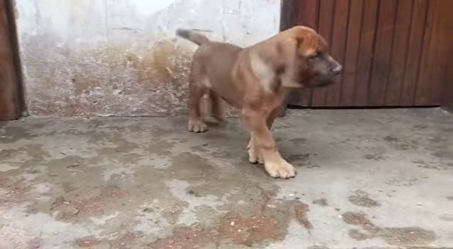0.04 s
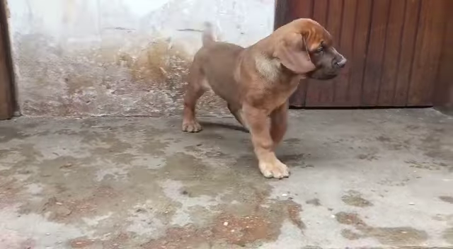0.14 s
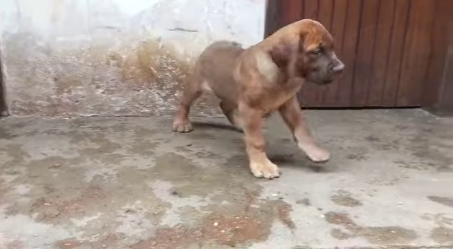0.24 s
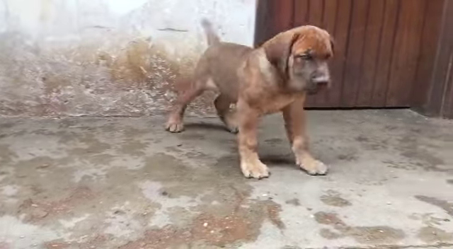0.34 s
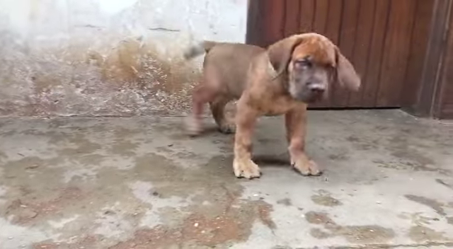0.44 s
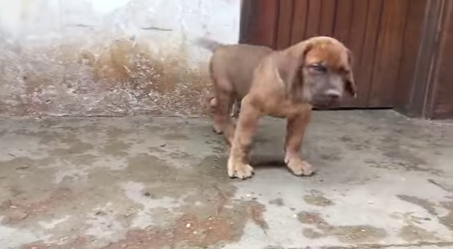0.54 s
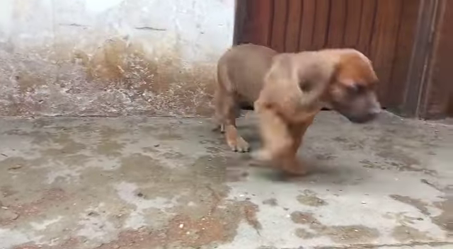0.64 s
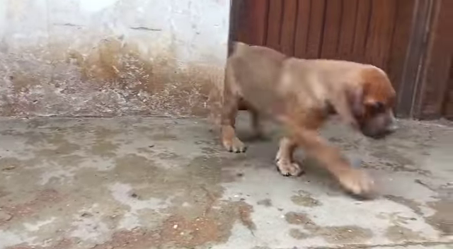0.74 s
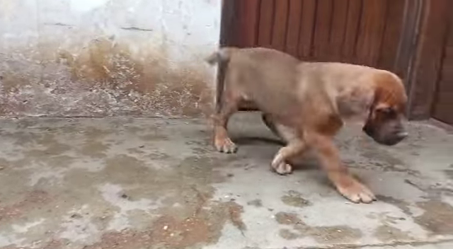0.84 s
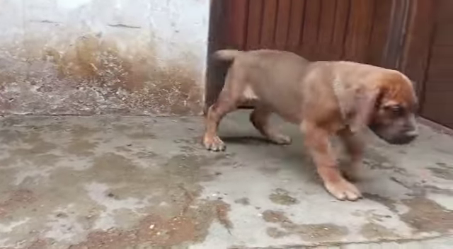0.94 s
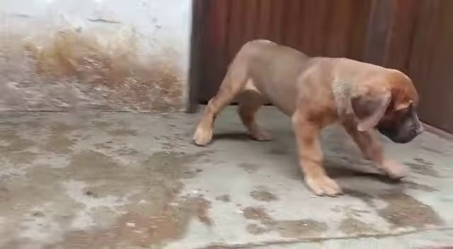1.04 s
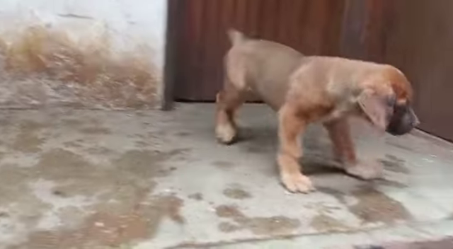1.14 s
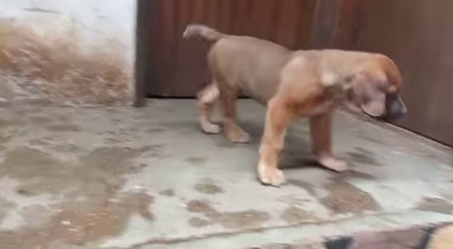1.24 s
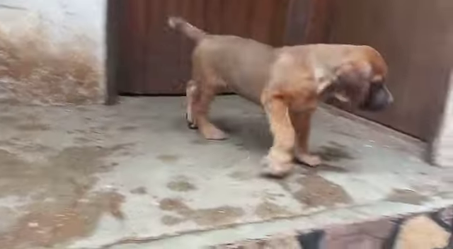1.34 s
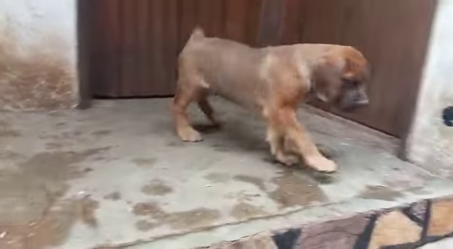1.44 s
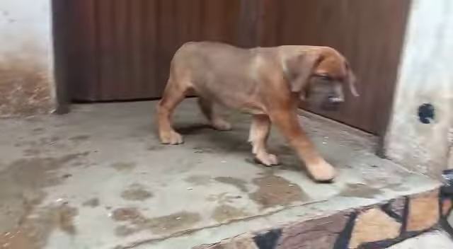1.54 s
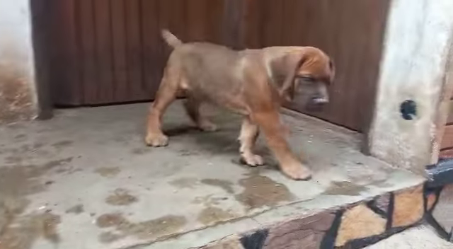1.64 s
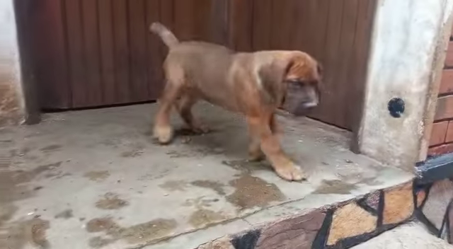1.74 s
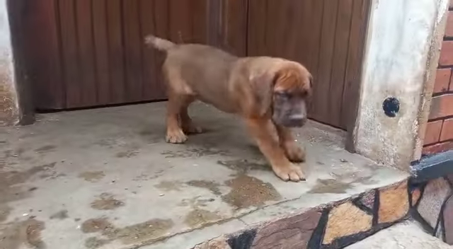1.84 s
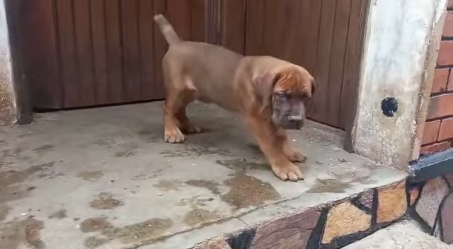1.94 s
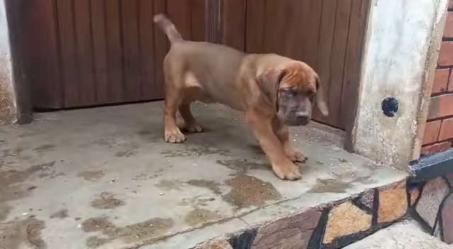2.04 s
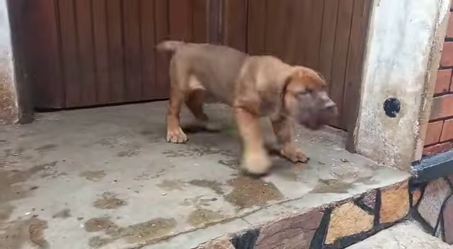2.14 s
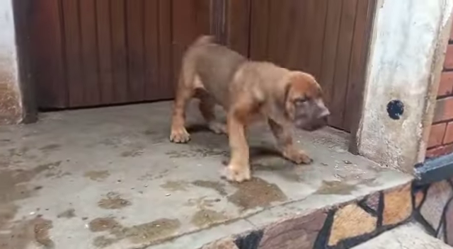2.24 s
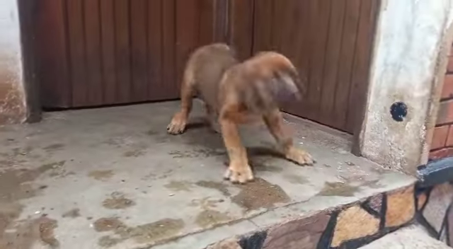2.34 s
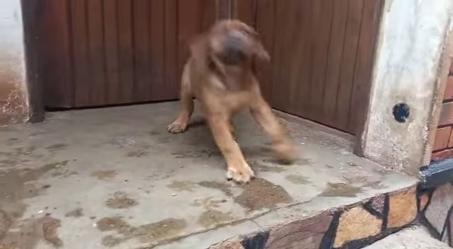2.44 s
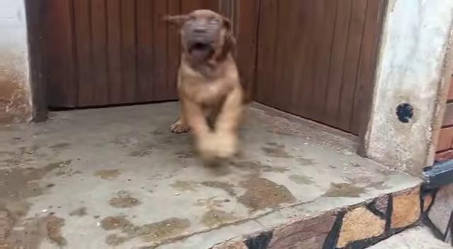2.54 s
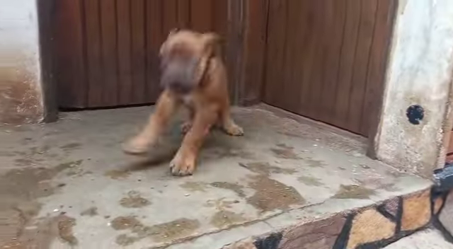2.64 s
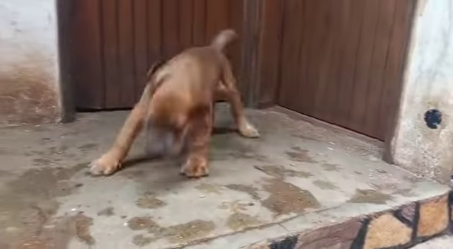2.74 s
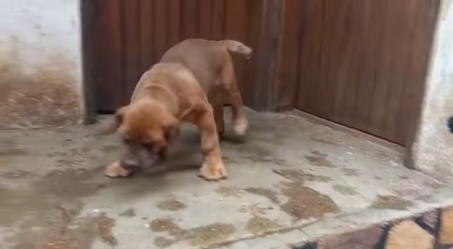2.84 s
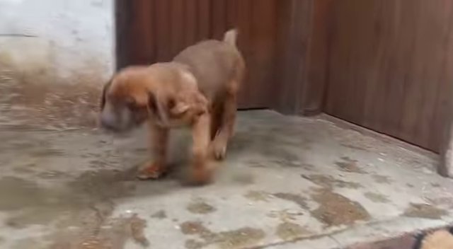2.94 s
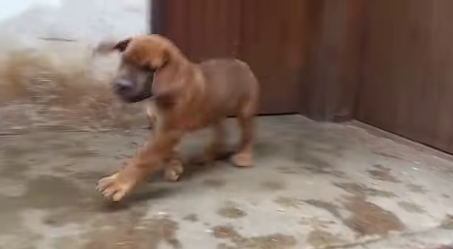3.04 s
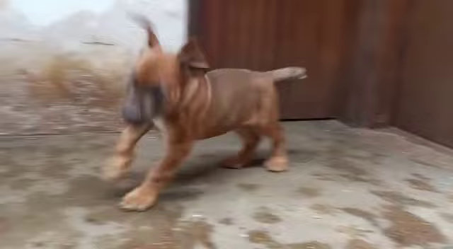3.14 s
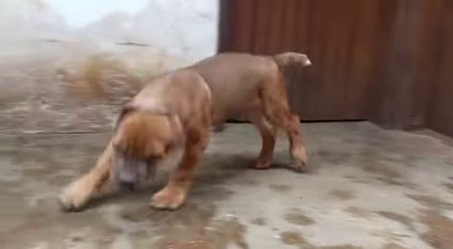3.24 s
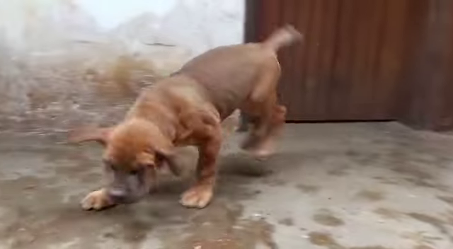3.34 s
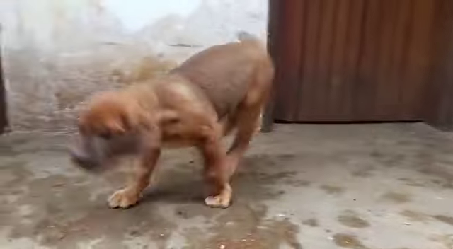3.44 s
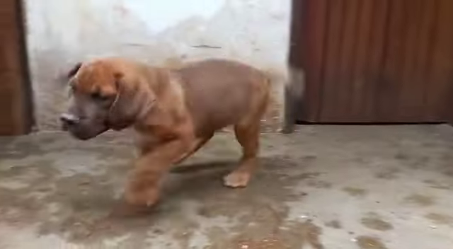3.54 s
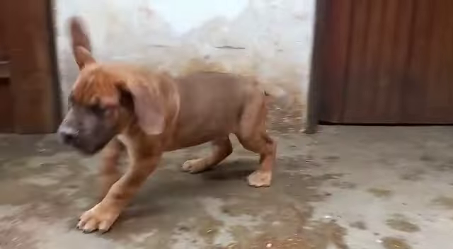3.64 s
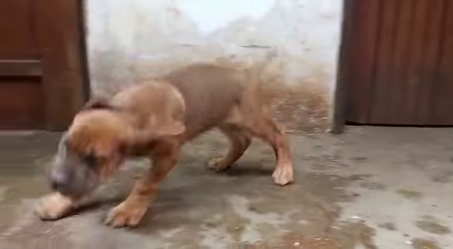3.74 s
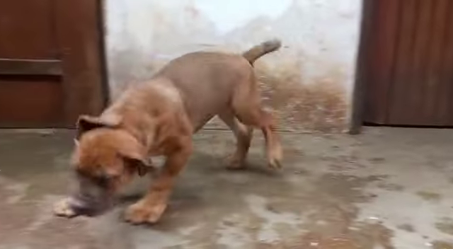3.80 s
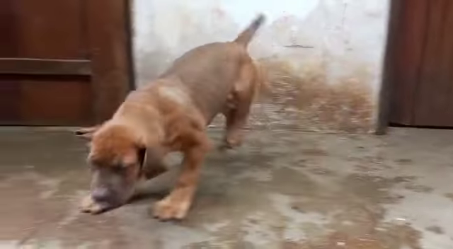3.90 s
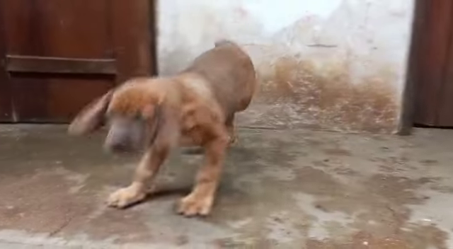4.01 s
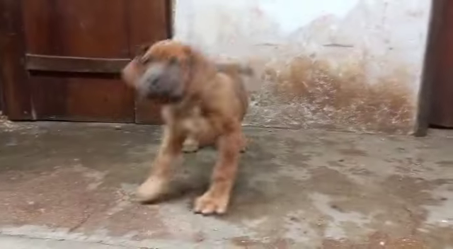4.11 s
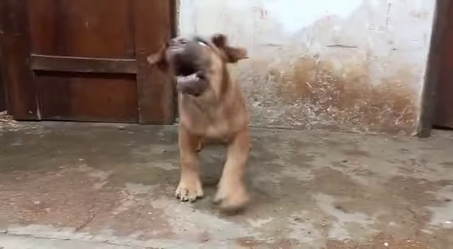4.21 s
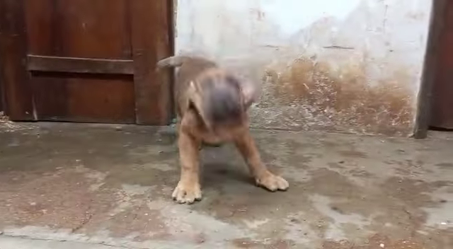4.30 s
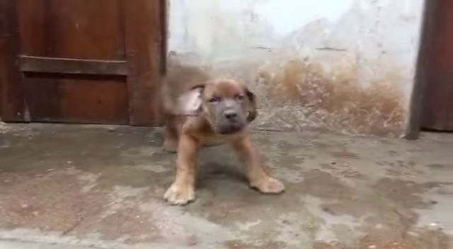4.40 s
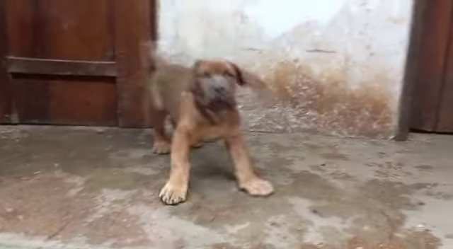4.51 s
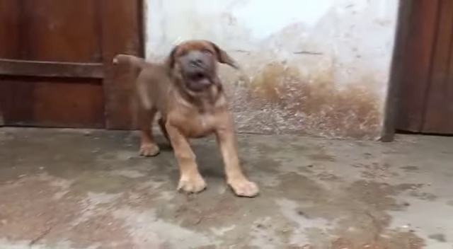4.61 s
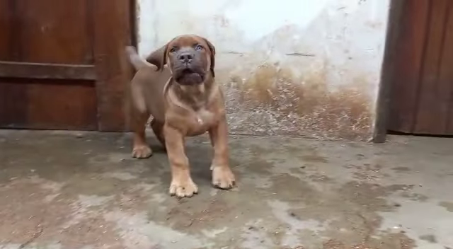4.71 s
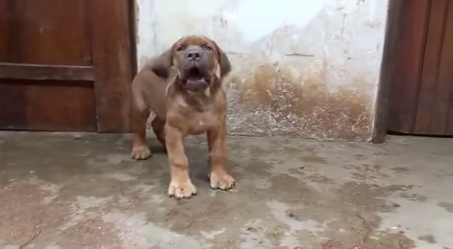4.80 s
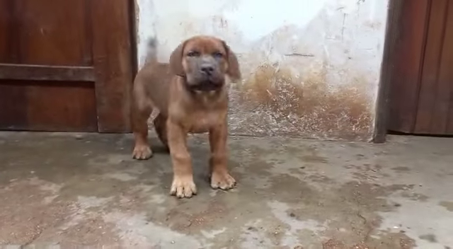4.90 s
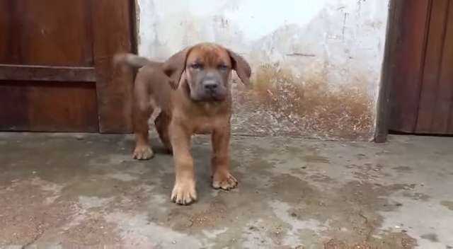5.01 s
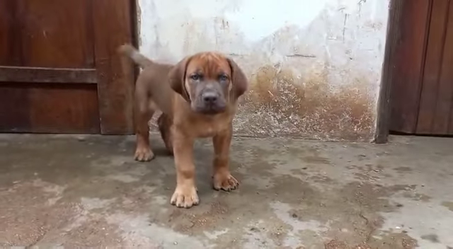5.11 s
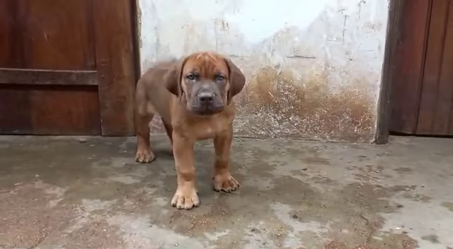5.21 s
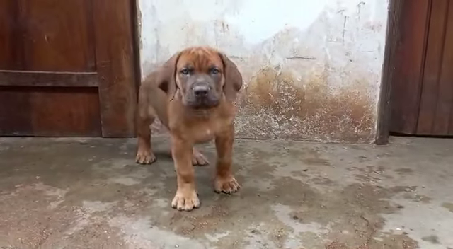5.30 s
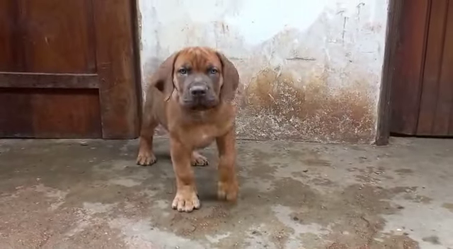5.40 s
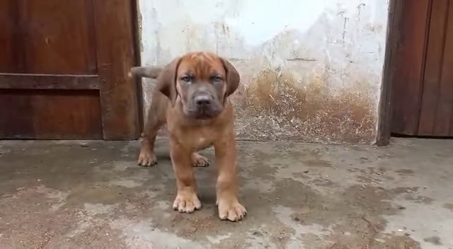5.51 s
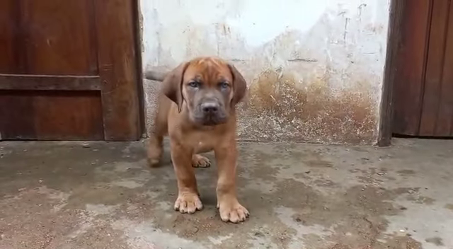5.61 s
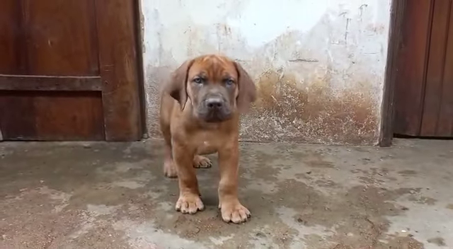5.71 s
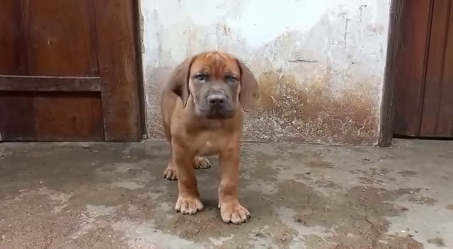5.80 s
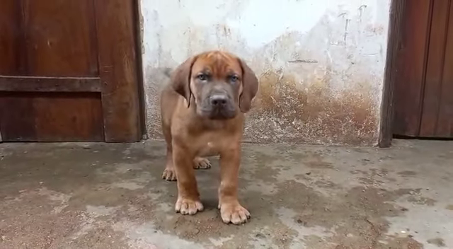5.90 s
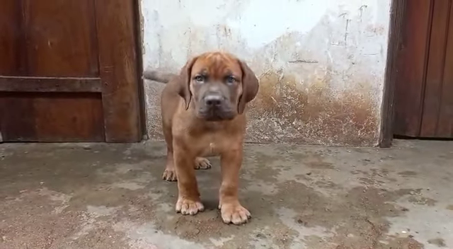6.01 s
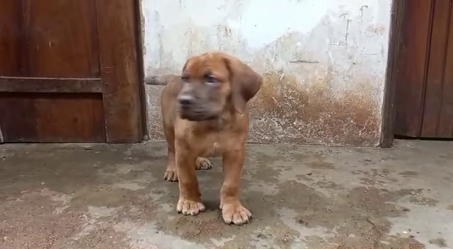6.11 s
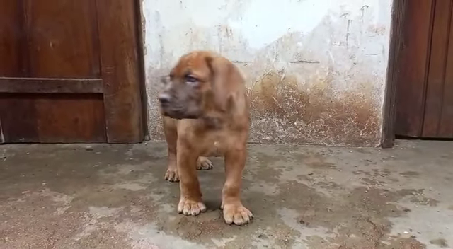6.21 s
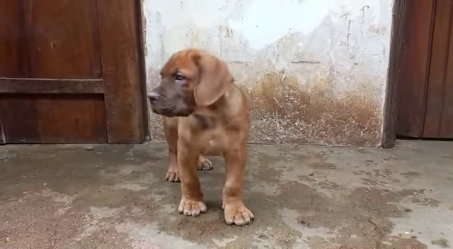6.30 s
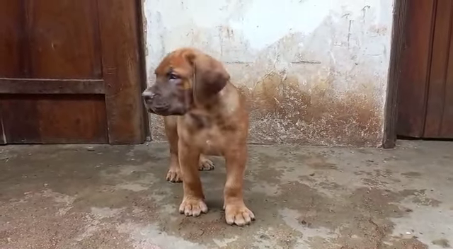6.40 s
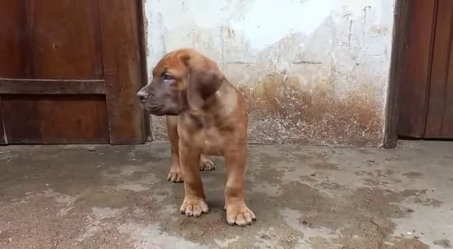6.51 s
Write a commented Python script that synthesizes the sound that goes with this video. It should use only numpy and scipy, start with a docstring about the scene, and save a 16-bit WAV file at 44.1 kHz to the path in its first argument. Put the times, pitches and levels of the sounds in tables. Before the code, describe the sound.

A puppy gives high, whistly whines, then breaks into short, cracking yelps and barks and a long moan in an echoing yard.

```python
"""Puppy in a concrete yard

A puppy whines six times, breaks into yelps and barks, and ends on a long moan. A thin whistle from its
nose starts and ends the whines; each bark starts clean, cracks, mostly turns hoarse and may sink to a moan.
Walls and doors ring after each call. Paws scuff, something hoots far away, the puppy sniffs,
and the hand-held microphone rumbles faintly."""
import sys
import numpy as np
from scipy import signal
from scipy.fft import rfft, irfft, next_fast_len
from scipy.io import wavfile
from scipy.ndimage import uniform_filter1d, minimum_filter1d

SR = 44100
rng = np.random.default_rng(int(sys.argv[2]) if len(sys.argv) > 2 else 0)


def unload_audio(sound):
    """Save the sound as a 16-bit wav file, at the path given as the first command line argument."""
    columns = np.transpose(np.atleast_2d(sound))
    # keep every value between -1 and 1, then stretch to whole-number steps
    steps = np.round(np.clip(columns, -1, 1) * 32767)
    wavfile.write(sys.argv[1], SR, steps.astype(np.int16))


N = 288855
TOP_HZ = 15800  # upper edge of the sound

# tone colour of the voice with the mouth nearly shut: f/Hz, level/dB
SHUT_MOUTH = [(1200, 0.5), (1700, -8), (2400, -3.5), (3000, 1.5), (3600, -3), (4400, -7.5), (5400, -19),
              (6500, -31), (9000, -36), (16000, -32)]
# tone colour of a deep rumble: f/Hz, level/dB
RUMBLE_COLOUR = [(20, -45.5), (45, -16), (75, 1), (130, 3.5), (200, -5.5), (400, -19), (1200, -42)]


def gain_of(db):
    """Turns decibels into a factor to multiply a sound by."""
    return 10 ** (np.asarray(db) / 20)


def evened(x):
    """Scales a signal to an average strength (rms) of 1."""
    return x / np.sqrt(np.mean(x ** 2) + 1e-20)


def read(points, hz):
    """Looks up a table by frequency, on a scale of octaves."""
    f, value = np.transpose(points)
    return np.interp(np.log(hz + 1), np.log(f + 1), value)


def add(mix, start, sound):
    """Adds a sound into the mix at a start time in seconds."""
    part = mix[max(round(start * SR), 0):][:len(sound)]
    part += sound[:len(part)]


def coloured(x, colour):
    """Makes each frequency louder or softer, as a tone colour table says."""
    return irfft(rfft(x) * gain_of(read(colour, np.fft.rfftfreq(len(x), 1 / SR))), len(x))


def noise(colour, size=N):
    """Noise of strength 1 with the given tone colour."""
    return evened(coloured(rng.standard_normal(size), colour))


def wander(size, rate_hz):
    """A smooth random wobble of strength 1, mostly slower than the rate."""
    hz = np.fft.rfftfreq(SR, 1 / SR)
    return evened(irfft(rfft(rng.standard_normal(SR)) / (1 + (hz / rate_hz) ** 4), SR))[:size]


def span(length, fade):
    """Gives the time since a sound began, and a gate that fades it in and out."""
    t = np.arange(0, length + fade, 1 / SR)
    return t, np.sin(np.pi / 2 * np.clip(np.minimum(t, t[-1] - t) / fade, 0, 1)) ** 2


def switch(t, width, before, after):
    """Passes smoothly from one value to another around t = 0."""
    return before + (after - before) * (1 + np.tanh(t / width)) / 2


# tone colour of a bright rustle or scuff: f/Hz, level/dB
RUSTLE_COLOUR = [(300, -2.5), (1000, 0), (5000, 19.5), (9000, -5), (12000, 2.5), (16000, -8.5)]


def background(rumble_db=-1, rush_db=-2, rustle_db=-1, low_spread=.5):
    """The hand rumbles on the microphone, beside a low rush and a wide, faint rustle."""
    # tone colour of the rush: f/Hz, level/dB
    rush_colour = [(100, -24.5), (190, -7.5), (240, 3.5), (330, -1.5), (420, -5), (900, -10.5),
                   (2500, -38.5)]
    # how each of the three swells and fades: t/s, level/dB
    rumble_levels = [(0.0, -93), (0.64, -83), (1.02, -65.5), (1.6, -61), (1.99, -64.5), (2.24, -82),
                     (4.89, -86.5), (5.09, -69), (5.65, -85.5), (6.55, -62.5)]
    rush_levels = [(0.0, -75), (0.62, -86.5), (0.88, -61.5), (1.92, -57), (1.97, -51.5), (2.21, -70),
                   (3.08, -73), (3.37, -45.5), (3.52, -65), (4.12, -71), (4.21, -53.5), (4.54, -81),
                   (4.91, -52.5), (5.33, -51.5), (5.65, -87), (6.55, -62)]
    rustle_levels = [(0, -71.5), (1.2, -54.5), (2.861, -51), (3.149, -69.5), (3.789, -56.5), (5.25, -77.5),
                     (5.651, -66.5), (6.55, -86)]
    t = np.arange(N) / SR
    rumble = gain_of(rumble_db + np.interp(t, *np.transpose(rumble_levels)))
    rush = gain_of(rush_db + np.interp(t, *np.transpose(rush_levels)))
    rustle = gain_of(rustle_db + np.interp(t, *np.transpose(rustle_levels)))
    middle, side = (rumble * noise(RUMBLE_COLOUR) + rush * noise(rush_colour) for _ in range(2))
    fizz = rustle * np.array([noise(RUSTLE_COLOUR), noise(RUSTLE_COLOUR)])
    return middle + low_spread * np.array([side, -side]) + fizz


def nose_whistles(glide_share=.45, fade_db=-1.5, jitter=.0051, octave_db=-22):
    """Air whistles thinly through the nose; the higher the note, the less steady it is."""
    # start/s, length/s, first pitch/Hz, settled pitch/Hz, level/dB
    whistles = [(0.029, .07, 5580, 5950, -56), (0.243, .055, 5180, 4980, -43.5),
                (0.498, .08, 5780, 5850, -49), (0.687, .045, 4700, 5000, -48.5),
                (0.86, .1, 5720, 6020, -45.5), (1.035, .075, 5050, 4900, -36),
                (1.261, .1, 5740, 5950, -46.5), (1.452, .06, 5270, 5330, -44.5),
                (1.65, .085, 5850, 5830, -39.5), (1.888, .055, 5097, 5050, -33),
                (2.079, .025, 5600, 5750, -37), (2.365, .05, 5140, 5380, -53),
                (2.753, .14, 5117, 4690, -29.5), (3.619, .025, 5000, 5300, -46),
                (4.739, .022, 5020, 5440, -49.5), (5.267, 0.0414, 5810, 5200, -42.5)]
    out = np.zeros(N)
    for start, length, first_hz, settled_hz, db in whistles:
        t, gate = span(length, fade=.012)
        hz = settled_hz + (first_hz - settled_hz) * np.exp(-t / (glide_share * length))
        unsteady = jitter * (hz / 5000) ** 7
        phase = 2 * np.pi * np.cumsum(hz * (1 + unsteady * wander(len(t), rate_hz=220))) / SR
        flutter = 1 + .37 * wander(len(t), rate_hz=140)
        tone = np.sqrt(2) * (np.sin(phase) + gain_of(octave_db) * np.sin(2 * phase))
        add(out, start, gate * gain_of(db + fade_db * t / length) * flutter * tone)
    return out


def overtones(cycles, hz, mouth, bright_db, multiples, waver_db=3.5, entry_s=.0031):
    """The vocal folds add tones at multiples of the pitch; the mouth shapes them and each one wavers."""
    # where a wider mouth lifts the overtones: f/Hz, share of the lift
    mouth_lift = [(2400, 0.0062), (2800, 0.9), (5000, 0.89), (9000, 0.96)]
    out, t = np.zeros(len(hz)), np.arange(len(hz)) / SR
    for k in multiples:
        db = read(mouth, k * hz) + bright_db * read(mouth_lift, k * hz)
        db += waver_db * wander(len(t), rate_hz=34)
        # the folds need a few cycles to snap shut, so higher overtones enter later
        entry = np.clip(t / (entry_s * k), 0, 1) ** 2
        out += gain_of(db) * (k * hz < TOP_HZ) * entry * np.cos(2 * np.pi * k * cycles)
    return np.sqrt(2) * out


def whines(level_db=-1, break_s=.008, end_drop=.15, weak_below_hz=740, air_db=-7):
    """A nearly pure tone slides to a high note, breaks to a low one and sags, with a little nose air."""
    # start/s, length/s, time until the break/s, first pitch/Hz, high pitch/Hz, low pitch/Hz, sag/(Hz/s),
    # high level/dB, low level/dB, high note's overtones/dB, low note's overtones/dB
    calls = [(0.043, 0.22, 0.063, 1318, 1186, 892, 566, -41, -36, -9, -17.5),
             (.512, 0.17, 0.087, 800, 1224, 867.4, 870, -30, -30.5, -14, -17.5),
             (0.881, .166, 0.078, 830, 1199, 903, 980, -21, -28.5, -13.5, -16),
             (1.284, 0.15, 0.081, 850, 1238, 901.5, 2970, -15.5, -15, -13.5, -24),
             (1.683, .217, 0.087, 900, 1165, 906, 447, -26, -27, -13, -14),
             (2.149, 0.23, 0.083, 1000, 1215, 835, 2075, -23, -32, -15, -16.5)]
    # tone colour of the rushing air: f/Hz, level/dB
    air_colour = [(300, -9.5), (1600, -9), (3200, 6), (4200, -5.5), (5800, 5.5), (6600, -6), (7600, -8),
                  (9000, -29.5), (13000, -10), (16000, -15)]
    out = np.zeros(N)
    for (start, length, high_s, first_hz, high_hz, low_hz, sag,
         high_db, low_db, high_over_db, low_over_db) in calls:
        t, gate = span(length, fade=.0051)
        since_break = t - high_s
        scoop = high_hz + (first_hz - high_hz) * np.exp(-t / .015)
        spent = np.exp((np.minimum(t, length) - length) / .0084)  # rises to 1 as the breath runs out
        hz = switch(since_break, 2 * break_s, scoop, low_hz - sag * since_break) * (1 - end_drop * spent)
        hz *= 1 + .011 * wander(len(t), rate_hz=330)
        cycles = np.cumsum(hz) / SR
        db = level_db + switch(since_break, break_s, high_db, low_db)
        db -= 20 * np.exp(-t / .012) + 6.5 * spent  # soft start and end
        db -= 19 * np.maximum(np.log2(weak_below_hz / hz), 0)  # the voice weakens on low notes
        over_db = switch(since_break, break_s, high_over_db, low_over_db)
        upper = overtones(cycles, hz, SHUT_MOUTH, bright_db=-3, multiples=np.arange(2, 16))
        air = gain_of(air_db) * noise(air_colour, len(t))
        flutter = 1 + .45 * wander(len(t), rate_hz=47)
        tone = np.sqrt(2) * np.sin(2 * np.pi * cycles) + gain_of(over_db) * (upper + air)
        add(out, start, gate * flutter * gain_of(db) * tone)
    return out


def paws(level_db=-9, decay_s=.0057):
    """Claws and pads scuff the concrete in short, bright bursts."""
    # t/s, level/dB
    scuffs = [(1.22, -43.5), (1.5477, -34.5), (2.3785, -53), (2.4477, -44.5), (3.5724, -57),
              (4.0829, -34.5), (4.623, -45.5)]
    out, t = np.zeros(N), np.arange(4096) / SR
    for start, db in scuffs:
        add(out, start, gain_of(db + level_db) * np.exp(-t / decay_s) * noise(RUSTLE_COLOUR, len(t)))
    return out


def hoots(waver=.019):
    """Soft, low tones come from far away."""
    # start/s, end/s, pitch/Hz, level/dB
    notes = [(1.843, 2.12, 282, -51), (3.099, 3.22, 216, -64), (5.551, 5.792, 343, -75.5)]
    out = np.zeros(N)
    for start, end, hz, db in notes:
        size = round((end - start) * SR)
        phase = 2 * np.pi * np.cumsum(hz * (1 + waver * wander(size, rate_hz=25))) / SR
        add(out, start, gain_of(db) * np.sqrt(2) * np.hanning(size) ** .5 * np.sin(phase))
    return out


def voice(hz, mouth, over_db, bright_db, rough):
    """Under strain the vocal folds first alternate strong and weak beats, then flap unevenly and hiss."""
    # tone colour of hoarse breath in the open throat: f/Hz, level/dB
    breath_colour = [(40, -55), (110, -25.5), (230, -27), (380, -33), (520, -0.5), (800, -1.5), (1100, 0.5),
                     (1850, 5.5), (2200, -2.5), (2900, -6.5), (3500, -2.5), (4000, -17), (4700, -5),
                     (5400, -19), (6300, -50.5), (7900, -25.5), (9200, -39.5), (16000, -32.5)]
    size, chaos = len(hz), rough ** 2
    hz = hz * (1 + (.006 + .06 * chaos) * wander(size, rate_hz=100))
    cycles = np.cumsum(hz) / SR
    whole = overtones(cycles, hz, mouth, bright_db, np.arange(2, 26))
    # alternating beats add tones halfway between the overtones
    halves = overtones(cycles, hz, mouth, bright_db, np.arange(1, 20) + .5)
    voiced = (whole + gain_of(-3) * rough * halves) / np.sqrt(1 + 3 * chaos)
    puffs = rng.standard_normal(size) * (1 + np.cos(2 * np.pi * cycles))  # one puff of air a cycle
    breath = (.049 + .72 * chaos) * evened(coloured(puffs, breath_colour))
    main_tone = np.sqrt(2 - chaos) * np.sin(2 * np.pi * cycles)
    flutter = 1 + .43 * chaos * wander(size, rate_hz=73)
    return flutter * (main_tone + gain_of(over_db) * (voiced + breath))


def barks(level_db=-1, crack_s=.0031, roughen_s=.012, fade_db=-3, dulling_db=-13.5, puff_db=-45):
    """A clean note swells and bends as the mouth opens, cracks, and dies as the mouth closes."""
    # start/s, length/s, clean part/s, swell/s; pitch/Hz: first, middle, before the crack, cracked, last;
    # level/dB: first, clean, cracked; then clean and cracked: overtones/dB, brightness/dB, roughness/0-1
    calls = [(2.085, .092, 0.047, 0.032, 1115, 982.4, 984.4, 1007, 1112, -28, -15.5, -21.5, 4.5, 18, 1, -6.5, 0.25, 0.03),
             (2.526, 0.1, 0.076, 0.062, 428.2, 653.2, 828.5, 862, 824, -51.5, -16, -6, 3, -2, -3.5, 2, 0.44, 0.56),
             (3.22, 0.14, 0.039, 0.033, 930, 773, 771.3, 625, 564.7, -40, -14.5, -14.5, 3, 5.5, -6, -4, 0.3, 0.83),
             (3.644, 0.17, 0.061, 0.051, 744, 758.6, 820.4, 968.5, 925, -33, -10.5, -23, -2, 15, 0, -1.5, 0, .42),
             (4.178, .154, 0.055, 0.036, 666.4, 784.2, 778, 817.5, 775.3, -22, -9.5, -13, -4, 5, -2.5, -8, .15, 0.98),
             (4.753, 0.12, .061, 0.096, 743, 760.7, 809.5, 1105, 1117, -37, -3, -23.5, -16, 8.5, -2, -7, 0.1, 0.27)]
    # tone colour of the voice with the mouth wide open: f/Hz, level/dB
    open_mouth = [(600, 11.5), (1150, -8), (1600, -6), (2300, -4), (3000, 1.5), (3500, -10.5), (4000, -18),
                  (4700, -14), (5400, -32.5), (6300, -40), (7900, -43.5), (9200, -44), (12500, -42),
                  (16000, -42.5)]
    out = np.zeros(N)
    for (start, length, clean_s, swell_s, first_hz, middle_hz, strained_hz, cracked_hz, last_hz,
         first_db, clean_db, cracked_db, clean_over_db, cracked_over_db,
         clean_bright_db, cracked_bright_db, clean_rough, cracked_rough) in calls:
        t, gate = span(length, fade=.0027)
        since_crack = t - clean_s
        opening = np.minimum(t / clean_s, 1)
        closing = np.clip(since_crack / (length - clean_s), 0, 1)
        bend_hz = np.interp(opening, [0, .5, 1], [first_hz, middle_hz, strained_hz])
        hz = switch(since_crack, crack_s, bend_hz, cracked_hz + (last_hz - cracked_hz) * closing)
        swell_db = clean_db + (first_db - clean_db) * np.maximum(1 - t / swell_s, 0) ** 2
        db = level_db + switch(since_crack, crack_s, swell_db, cracked_db + fade_db * closing ** 2)
        over_db = switch(since_crack, crack_s, clean_over_db, cracked_over_db + dulling_db * closing)
        bright_db = switch(since_crack, crack_s, clean_bright_db, cracked_bright_db)
        rough = switch(since_crack, roughen_s, clean_rough * np.sqrt(opening), cracked_rough)
        puff = gain_of(puff_db) * rough ** 2 * noise(RUMBLE_COLOUR, len(t))
        add(out, start, gate * gain_of(db) * (voice(hz, open_mouth, over_db, bright_db, rough) + puff))
    return out


def moans(push_db_per_octave=25.5, strain_db=2, waver=.016, waver_hz=5.7):
    """The voice relaxes and sinks to a low, soft, nearly clean note that wavers slowly."""
    # start/s, length/s, first pitch/Hz, settled pitch/Hz, settling/s, level/dB, change/dB, overtones/dB
    calls = [(2.66, 0.076, 841.3, 782.3, 0.077, -32, 5, -20),
             (3.424, .05, 592, 584, 0.019, -32.5, 0.5, -31), (3.856, .11, 542, 502.5, 0.052, -30.5, 3, -22),
             (4.863, 0.39, 902, 579.1, 0.027, -35.5, -4.5, -13)]
    out = np.zeros(N)
    for start, length, first_hz, settled_hz, settle_s, db, change_db, over_db in calls:
        t, gate = span(length, fade=.025)
        hz = settled_hz + (first_hz - settled_hz) * np.exp(-t / settle_s)
        push_db = push_db_per_octave * np.log2(hz / settled_hz)  # the main tone is louder while high
        hz *= 1 + waver * np.cos(2 * np.pi * waver_hz * t)
        upper_db = over_db - push_db + strain_db * t / length  # overtones grow as the breath runs out
        tone = voice(hz, SHUT_MOUTH, upper_db, bright_db=0, rough=.098)
        add(out, start, gate * gain_of(db + push_db + change_db * t / length) * tone)
    return out


def sniffs(hiss_db=-3, ring_db=-3):
    """Air drawn or blown through the nose hisses and makes the nose ring at a few pitches."""
    # start/s, length/s, level/dB, fade/dB
    breaths = [(5.798, 0.26, -54.5, -10), (6.154, 0.094, -53.5, -1), (6.239, 0.29, -55.5, -5.5)]
    # tone colour of the nose: f/Hz, level/dB
    nose_colour = [(500, -23.5), (1500, -20.5), (1900, 1.5), (2100, -13.5), (2320, -9), (2650, -6),
                   (3200, -1.5), (3700, -4), (4450, -7), (5200, -3), (6600, -19), (9000, -29), (13000, -26),
                   (16000, -33)]
    # narrow bands where the nose rings: f/Hz, width/Hz, level/dB
    nose_rings = [(1914, 81, -1.5), (2330, 83, -8), (3240, 100, 0.5), (4450, 210, 4)]
    out = np.zeros(N)
    for start, length, db, fade_db in breaths:
        t, gate = span(length, fade=.029)
        hz = np.fft.rfftfreq(len(t), 1 / SR)
        peaks = sum(gain_of(peak_db) / (1 + (2 * (hz - centre) / width) ** 2)
                    for centre, width, peak_db in nose_rings)
        rings = gain_of(ring_db) * evened(irfft(rfft(rng.standard_normal(len(t))) * peaks, len(t)))
        hiss = gain_of(hiss_db) * noise(nose_colour, len(t))
        add(out, start, gate * gain_of(db + fade_db * t / length) * (hiss + rings))
    return out


def wall_echoes(x, first_echo_s=.0082, build_s=.009, echoes_per_s=3000):
    """The walls throw back a crowd of echoes; the bass lasts longest and is alike left and right."""
    # how long the yard rings: f/Hz, time to fade by 60 dB/s
    ring_times = [(150, .65), (600, .5), (2000, .54), (5000, .46), (15000, .4)]
    # how alike left and right are: f/Hz, likeness/0-1
    likeness = [(100, 1), (600, 0.93), (1400, .2), (3000, 0.037), (15000, 0.99)]
    echoes = rng.standard_normal((2, SR)) * (rng.random((2, SR)) < echoes_per_s / SR)
    hz, t, (left, other) = signal.stft(echoes, SR, nperseg=256)
    same = read(likeness, hz)[:, None]
    right = same * left + np.sqrt(1 - same ** 2) * other
    decay = gain_of(-60 * t / read(ring_times, hz)[:, None])
    tail = signal.istft(np.array([left, right]) * decay, SR, nperseg=256)[1]
    tail *= np.clip((np.arange(tail.shape[1]) / SR - first_echo_s) / build_s, 0, 1)
    return signal.fftconvolve(x[None], tail / np.linalg.norm(tail[0]), axes=1)[:, :N]


def microphone(echoes, direct_sounds):
    """Two openings each colour the sound; direct sounds reach the right one a moment later."""
    # quick copies thrown back by the ground and the nearest wall: delay/s, share of the strength
    near_echoes = [(.00132, 0.023), (.0051, 0.11)]
    # how the two openings differ: f/Hz, left minus right/dB
    balance = [(300, -0.5), (900, 0.5), (1600, -1.5), (2200, -5), (3000, -10), (4600, -19), (5400, -10),
               (6200, -6.5), (7800, 15.5), (10000, 9), (12500, 2.5), (15000, -2.5)]
    size = next_fast_len(N + 4096)
    hz = np.fft.rfftfreq(size, 1 / SR)
    pair = rfft(echoes, size)
    for sound, lag_s in direct_sounds:
        pair += rfft(sound, size) * np.exp(-2j * np.pi * hz * np.array([[0], [lag_s]]))
    copies = sum(share * np.exp(-2j * np.pi * hz * delay) for delay, share in near_echoes)
    pair *= 1 + copies / (1 + hz / 6000)  # the copies carry less treble
    ratio = gain_of(read(balance, hz))
    openings = np.array([ratio, np.ones(len(hz))]) * np.sqrt(2 / (1 + ratio ** 2))
    return irfft(pair * openings, size)[:, :N]


def scene(whine_echo_db=-5, bark_echo_db=-6, whistle_echo_db=-6, small_echo_db=-5, chop=.53):
    """The puppy is heard directly and off the walls, over the background and the far hoots."""
    whining = whines()
    barking = barks() + moans()
    # while the vocal folds vibrate in a whine they chop the whistle's air, which gives it side tones
    whistling = nose_whistles() * (1 + chop * np.tanh(whining / .012))
    small_sounds = sniffs() + paws()
    echoes = wall_echoes(gain_of(whine_echo_db) * whining + gain_of(bark_echo_db) * barking
                         + gain_of(whistle_echo_db) * whistling + gain_of(small_echo_db) * small_sounds)
    # sound, lag on the right/s: the puppy barks from further left than it whines
    direct_sounds = [(whining + whistling, .00003), (barking + small_sounds, .0001)]
    return microphone(echoes, direct_sounds) + background() + hoots()


def record(dry, ceiling=1.0):
    """A fast limiter turns down any peak above the ceiling; then the highest treble is cut."""
    allowed_gain = np.minimum(1, ceiling / (abs(dry).max(0) + 1e-9))
    limited = dry * uniform_filter1d(minimum_filter1d(allowed_gain, size=200), size=200)
    treble_cut = signal.firwin(511, TOP_HZ, window=("kaiser", 9), fs=SR)
    return signal.oaconvolve(limited, treble_cut[None], "same")


dry = scene()
out = record(dry)
unload_audio(out)
```